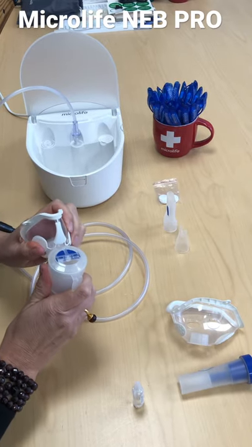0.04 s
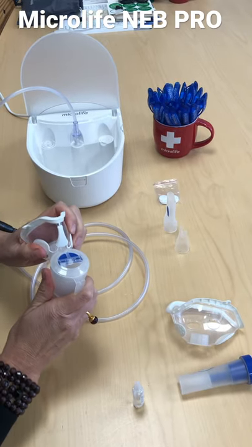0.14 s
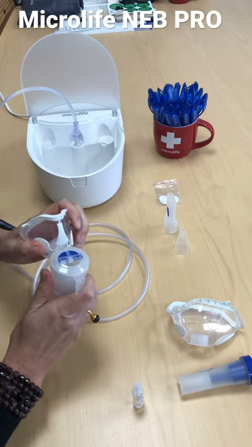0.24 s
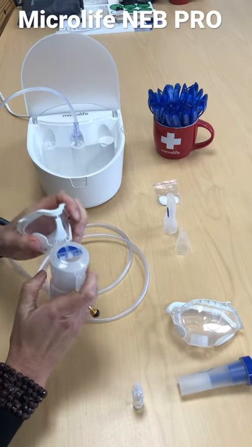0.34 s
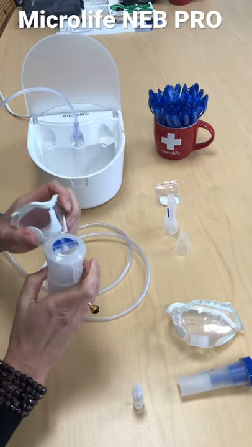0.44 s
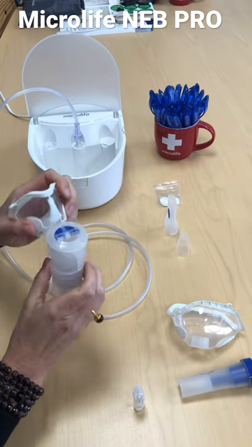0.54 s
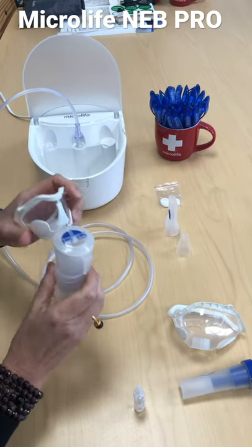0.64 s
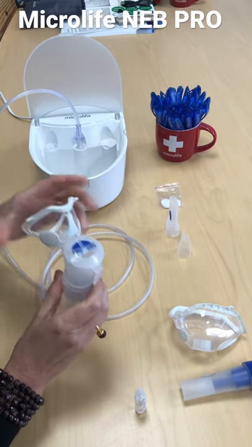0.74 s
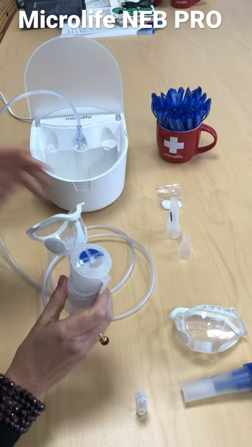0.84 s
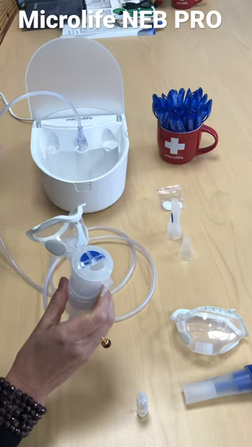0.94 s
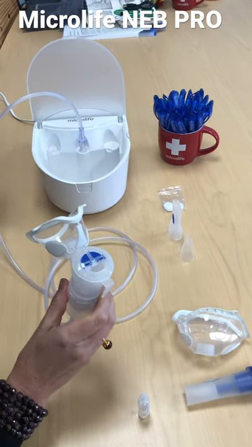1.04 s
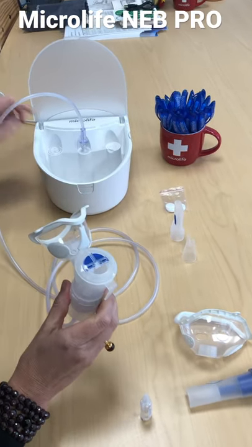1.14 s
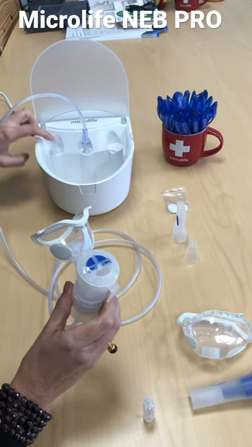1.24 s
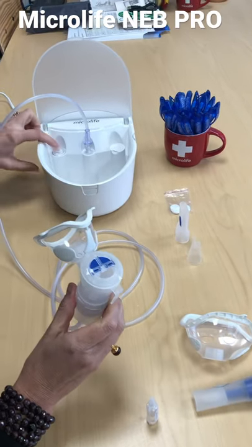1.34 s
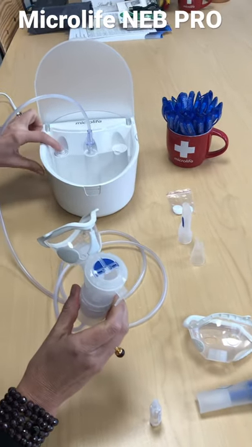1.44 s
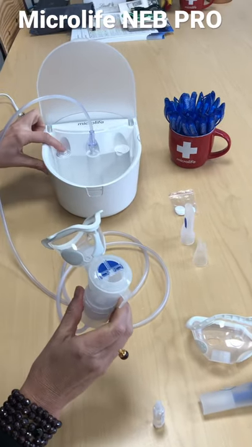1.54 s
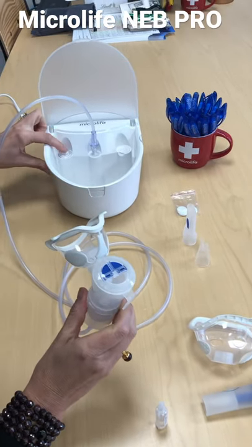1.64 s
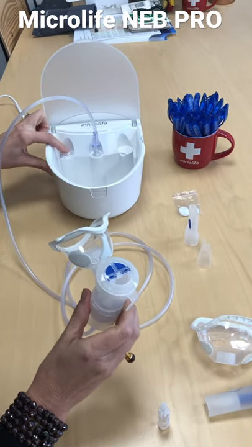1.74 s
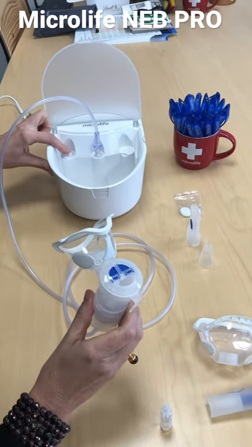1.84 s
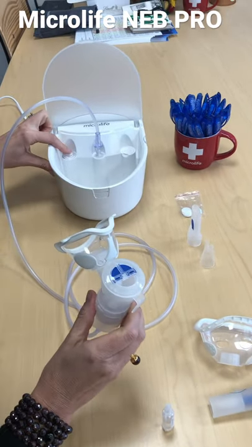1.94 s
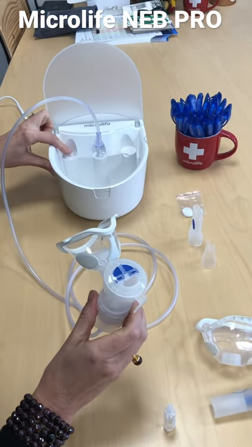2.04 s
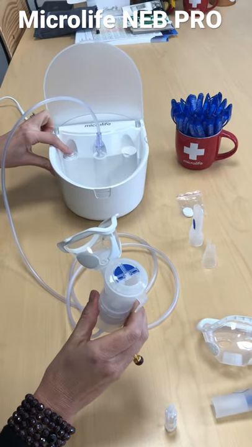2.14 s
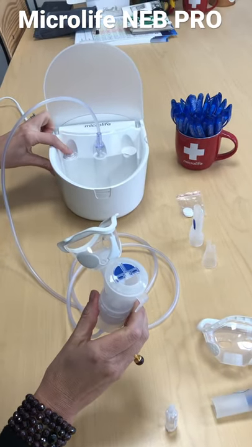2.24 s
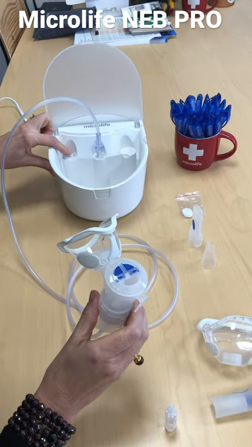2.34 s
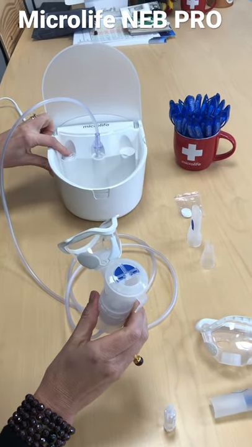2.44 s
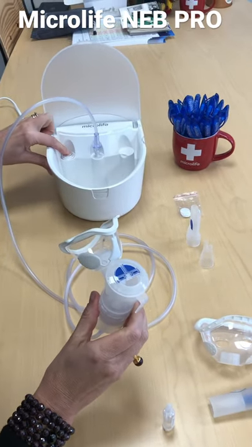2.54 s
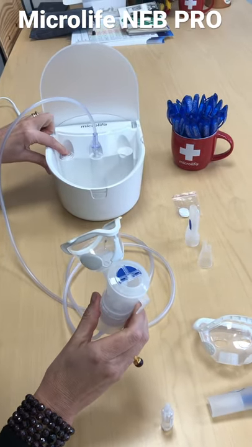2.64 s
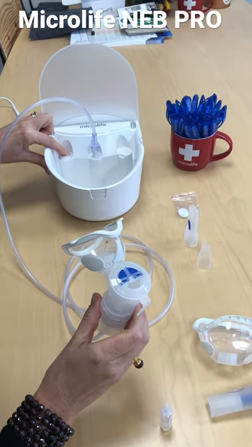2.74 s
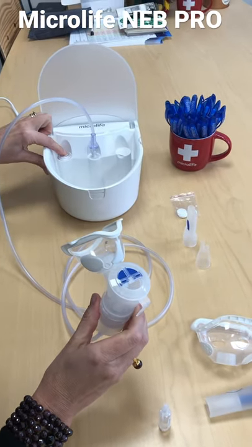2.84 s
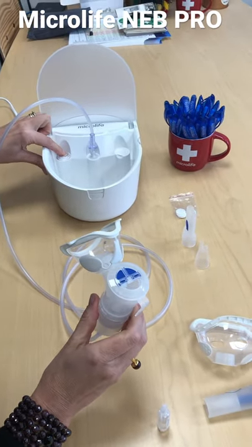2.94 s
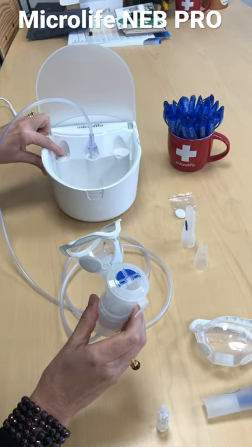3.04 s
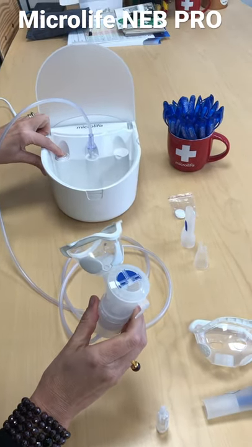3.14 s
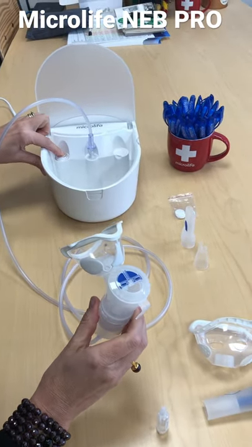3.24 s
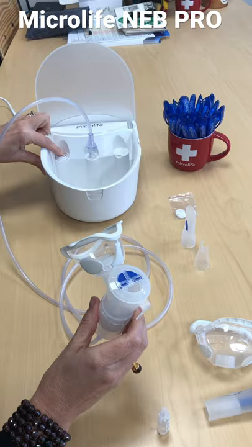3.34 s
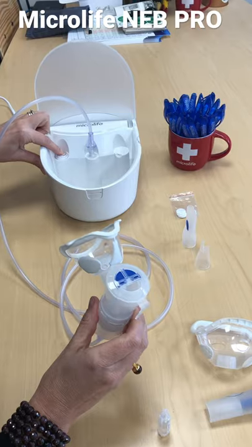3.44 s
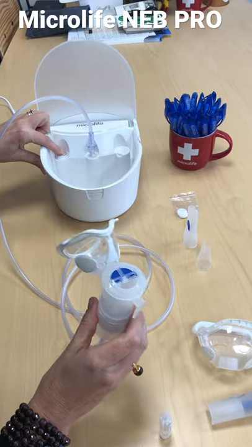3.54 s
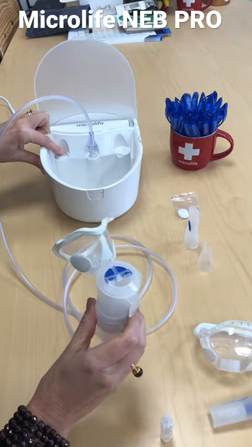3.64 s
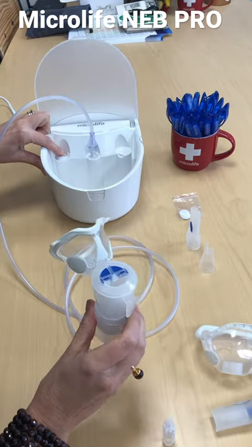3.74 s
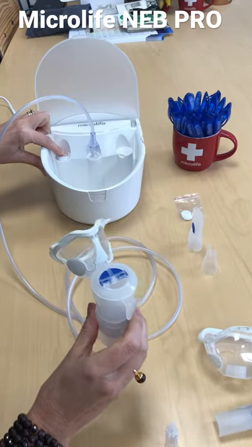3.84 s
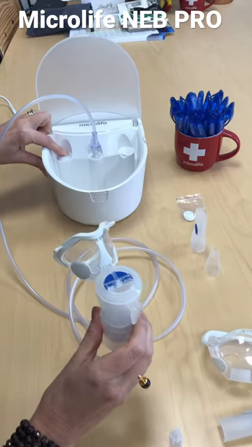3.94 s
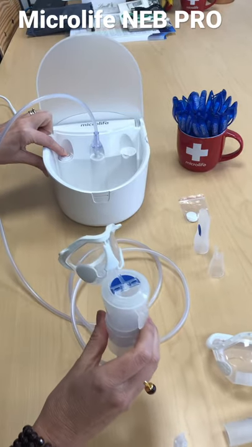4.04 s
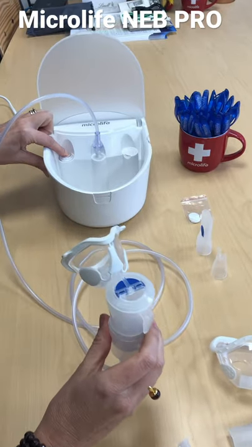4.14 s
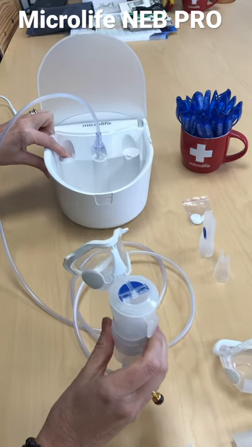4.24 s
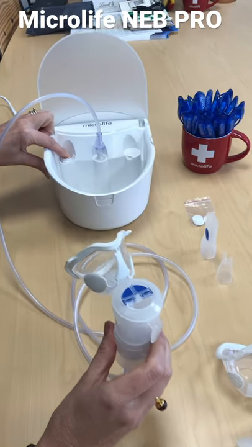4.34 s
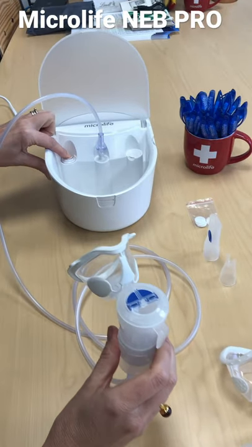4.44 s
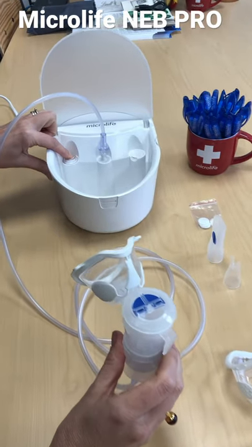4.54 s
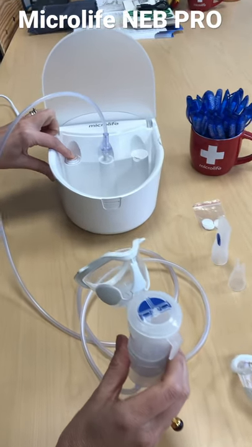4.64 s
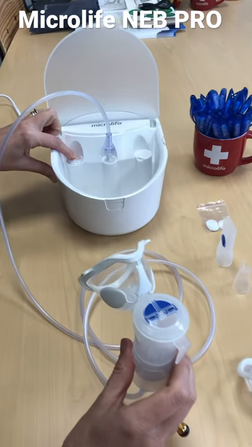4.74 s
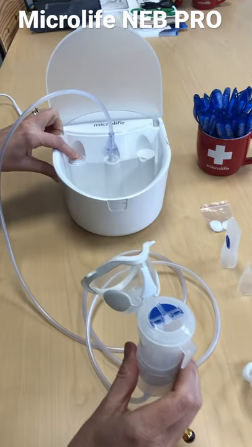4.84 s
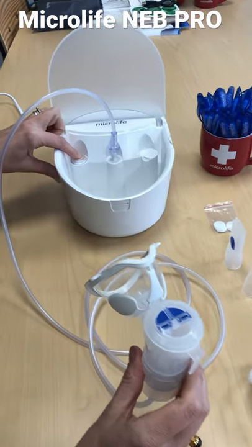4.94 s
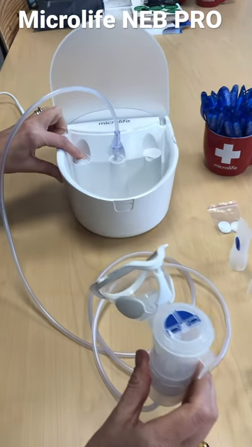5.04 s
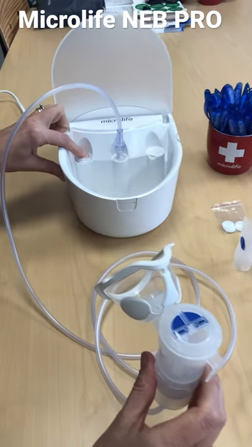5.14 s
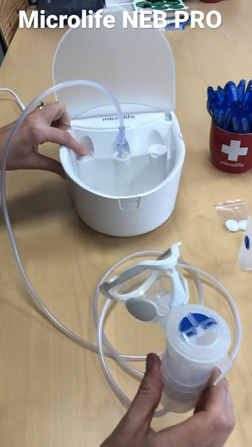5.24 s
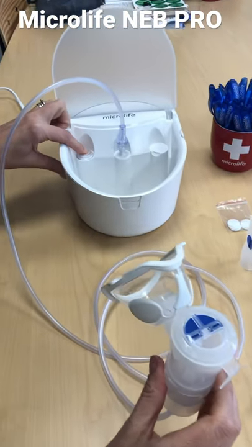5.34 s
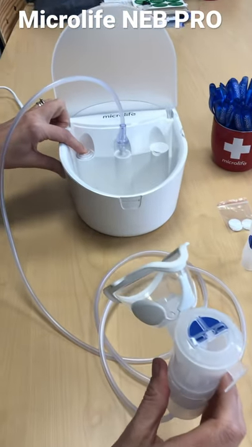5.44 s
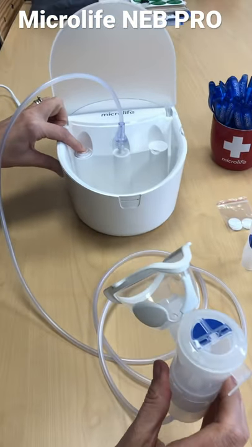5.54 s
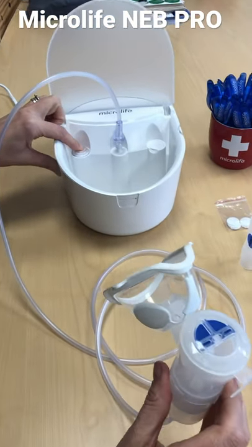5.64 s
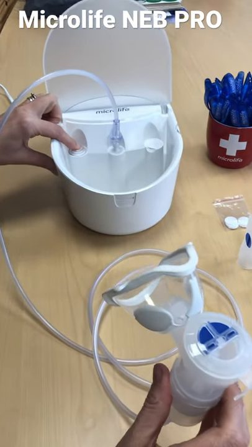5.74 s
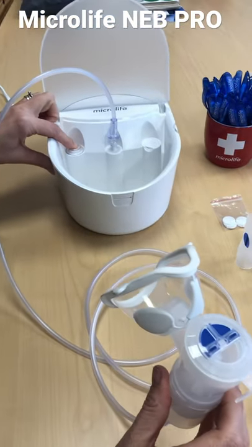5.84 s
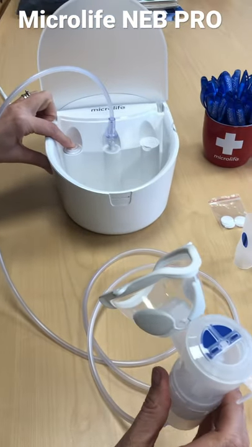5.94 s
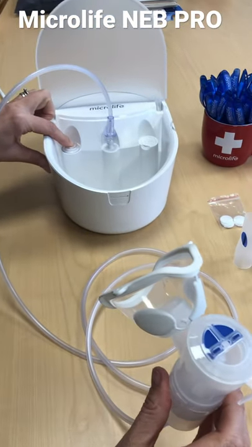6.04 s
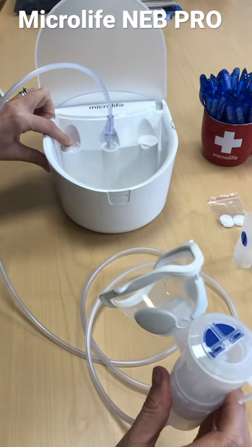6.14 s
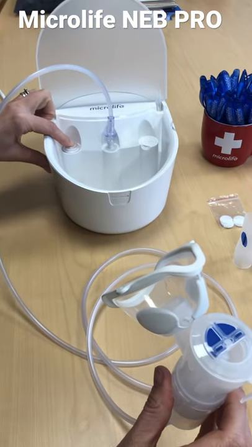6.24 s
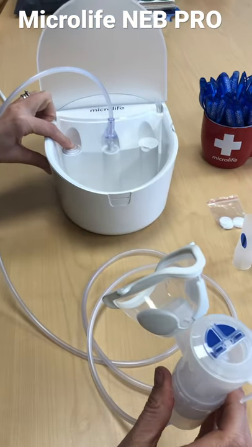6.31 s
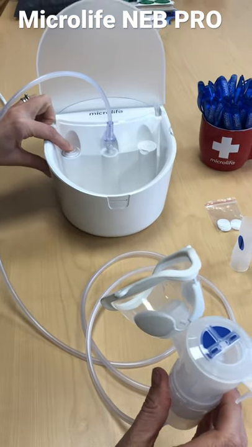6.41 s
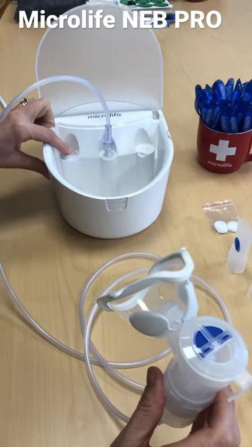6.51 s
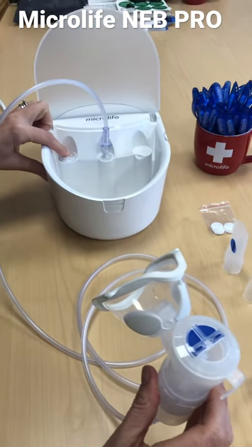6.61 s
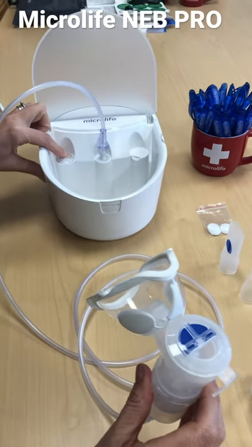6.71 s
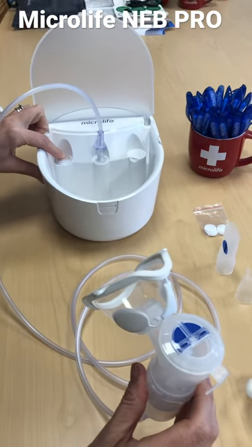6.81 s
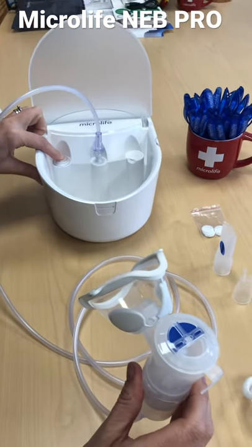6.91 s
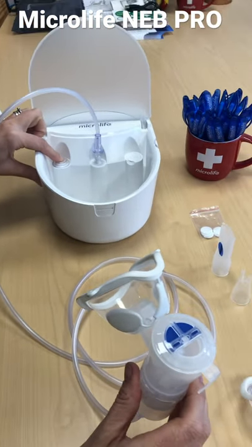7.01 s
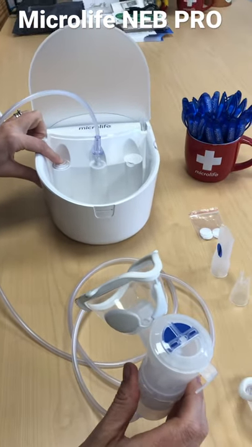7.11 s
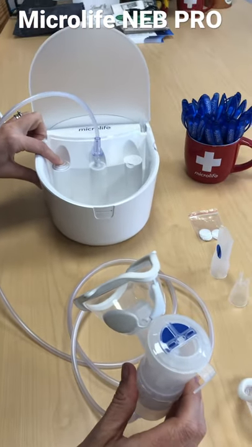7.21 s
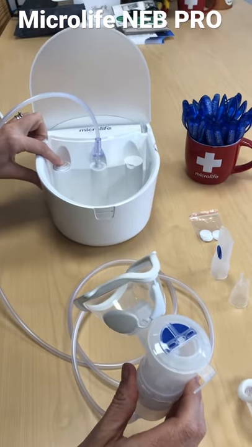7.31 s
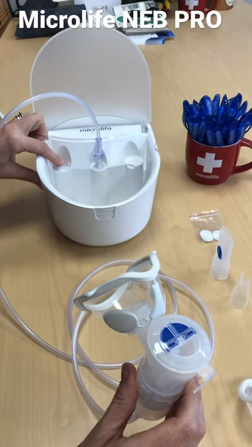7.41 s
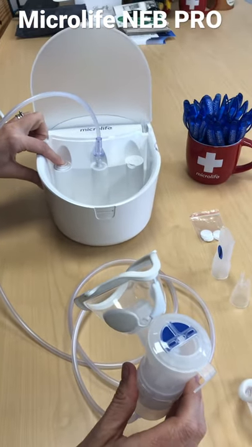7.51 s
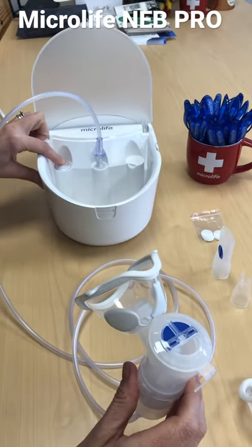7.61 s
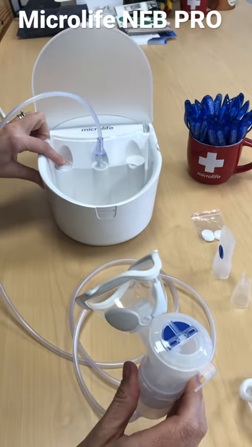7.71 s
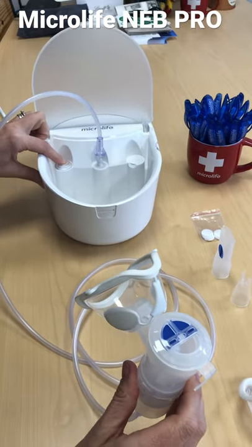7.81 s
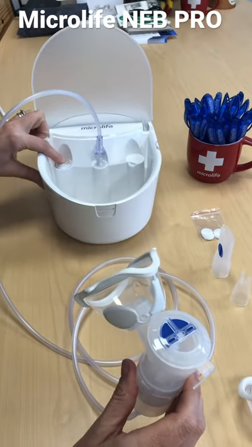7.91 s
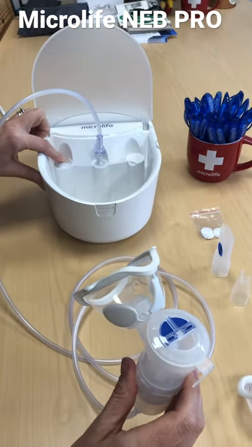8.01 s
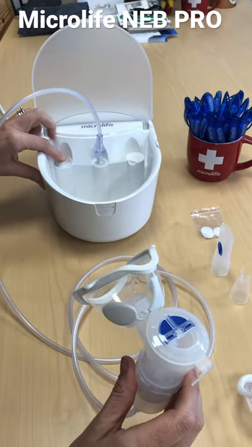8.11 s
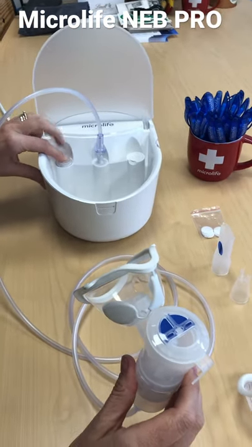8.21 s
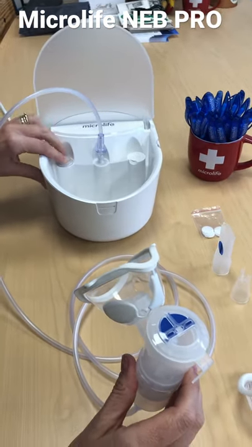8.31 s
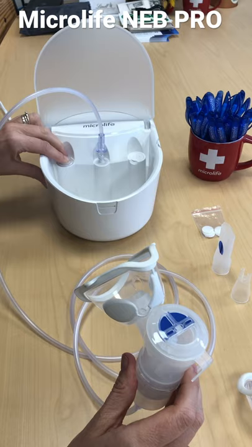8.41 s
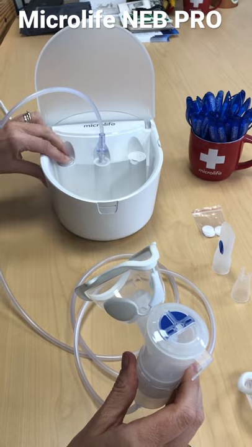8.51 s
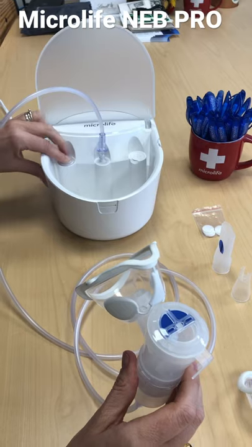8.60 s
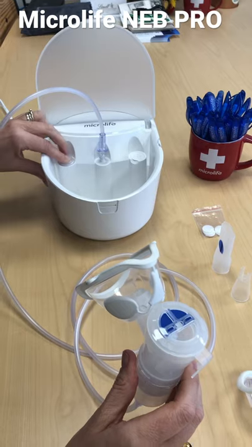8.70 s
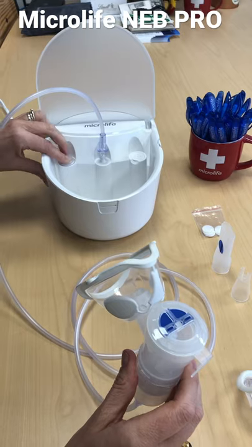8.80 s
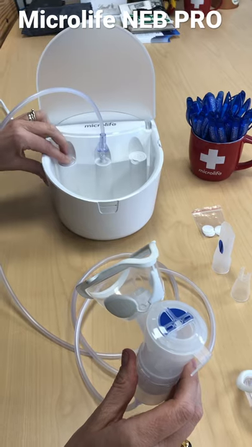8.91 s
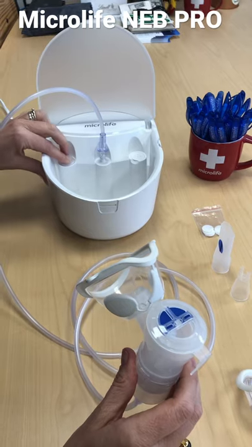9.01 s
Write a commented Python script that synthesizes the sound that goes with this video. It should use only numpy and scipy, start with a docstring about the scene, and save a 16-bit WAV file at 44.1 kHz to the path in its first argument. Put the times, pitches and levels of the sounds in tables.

```python
"""A quiet room rumbles, with a faint low hum that soon stops, and light plastic parts tick and rub together.
A rocker switch then snaps, and the small piston compressor of a nebulizer spins up and hums.
Its air hisses through the jet of a hand-held plastic cup, which is turned and brought nearer.
Struck bodies are sums of dying modes, rubbing and flow are coloured noise, and one turning shaft
times the hum, whine, valve puffs and jet pulsation; a single close microphone hears it all."""
import sys
import numpy as np
from scipy import signal
from scipy.io import wavfile

SR = 44100
rng = np.random.default_rng(int(sys.argv[2]) if len(sys.argv) > 2 else 0)


def persist_wave(psi):
    """Save psi, clipped to +-1, as 16-bit WAV."""
    counts = np.round(np.clip(psi, -1, 1) * 32767).astype(np.int16)
    wavfile.write(sys.argv[1], SR, np.atleast_2d(counts).T)


N = 399544
TIME = np.arange(N) / SR  # seconds

# Background rumble of the room. Each row: frequency in Hz, relative level in dB.
RUMBLE_SPECTRUM = [(18, -53), (30, -24), (45, -10.5), (85, -11.5), (108, -4.5), (170, -10), (206, -5),
                   (240, -11), (330, -14.5), (394, -14.5), (460, -17), (680, -22), (1200, -27.5),
                   (3000, -34.5), (16000, -42.5)]
RUMBLE_DB = -64  # rms
# A faint low hum: rms level in dB, moment it stops and time constant of its decay in seconds.
LOW_HUM_DB, LOW_HUM_END_S, LOW_HUM_RELEASE_S = -62.5, 0.285, 0.014
# Reverberation of the room. Each row: frequency in Hz, time to fall by 60 dB in seconds.
ROOM_DECAY = [(200, .4), (1000, 0.44), (4000, 0.59), (9000, 0.23), (16000, 0.4)]

# Parts sliding on each other. Each row: start in seconds, length in seconds, rms level at mid-stroke in dB.
SLIDES = [(0.148, 0.11, -72), (0.31, 0.06, -73), (0.385, 0.048, -68), (0.44, 0.04, -66), (0.63, 0.08, -76)]
# Plastic parts touching. Each row: start in seconds, approximate peak of the contact in dB,
# level of the hollow ring against that peak in dB, extra treble in dB per octave.
TICKS = [(0.153, -48, 1, 7), (0.176, -40.5, -3, -3), (0.211, -60, -11, -4), (0.301, -51, -3, -9),
         (0.328, -47, -15, 4), (0.336, -56, -7, -3), (0.398, -51, -14, -7), (0.412, -49, -16, 6),
         (0.437, -55, -12, 0), (0.457, -52, -19, 2), (0.465, -51.5, -17, -6), (0.584, -59, 1, -10),
         (0.638, -50, -16, -7), (0.656, -51, -9, -8), (0.672, -53.5, 6, -12), (0.684, -53, -4, -3)]
# Modes of the hollow parts. Each row: frequency in Hz, relative level in dB, time to fall by 60 dB in seconds.
PART_MODES = [(1320, -4, 0.029), (1590, 3, 0.029), (1930, -5, 0.032), (2200, -14, .04), (3320, -10, 0.031)]
# Colour of plastic contact. Each row: frequency in Hz, relative level in dB.
CONTACT_SPECTRUM = [(300, -21), (1000, -3), (2000, 2), (2700, -5), (4200, 2), (6500, -5), (9000, -5),
                    (12000, -10), (16000, -14)]

# The switch tips over, snaps and rebounds. Each row: start in seconds, approximate peak of the contact in dB.
SNAPS = [(2.4353, -32), (2.4398, -13.5), (2.4432, -24), (2.4508, -26)]
# Colour of the snap. Each row: frequency in Hz, relative level in dB.
SNAP_SPECTRUM = [(150, -45), (380, -22), (540, 4), (640, -3), (760, -12), (900, -29), (1400, -8),
                 (2300, -8), (4400, -4), (5650, 2), (6400, -8), (8850, 2.5), (10500, -10), (16000, -17)]
# Modes of the housing. Each row: frequency in Hz, relative level in dB, time to fall by 60 dB in seconds.
HOUSING_MODES = [(550, 4.5, 0.036), (556, -6, .1), (620, -8, .15), (860, -8, .06), (1600, -10, 0.12),
                 (1850, 2, 0.064), (2000, -12, .08), (3870, -6, 0.095), (5870, -5, .08), (7500, -11, .08),
                 (9000, -3, .09)]

# The motor gains speed at constant power, and slows a little under pressure and as it warms.
ON_S, SPIN_UP_S = 2.44, 0.242
RUN_HZ, UNLOADED_HZ, SAG_HZ_PER_S = 43.71, 0.3, 0.03
HUM_STANDSTILL_DB, VALVES_STANDSTILL_DB = -36, -20  # against full speed
# Winding buzz. Each row: frequency in Hz, rms level in dB.
WINDING_LINES = [(100, -63.5), (200, -66), (500, -67.5), (597, -55.5)]
# The shaft shifts the 100 Hz buzz up or down. Each row: multiple of the turn rate, rms level at full speed in dB.
BUZZ_SIDEBANDS = [(1, -62.5), (17, -62.5), (-17, -63), (-15, -63)]
# Harmonics of the shaft. Each row: multiple of the turn rate, relative level in dB.
SHAFT_ORDERS = [(1, -17), (2, -7.5), (3, -14), (4, 0), (5, -19), (6, -7.5), (7, -10), (8, -11.5),
                (9, -19.5), (10, -17), (11, -8), (12, -11.5), (13, -15), (14, 1), (15, -8), (16, -19),
                (17, -14.5), (18, -13.5), (19, -20), (20, -21), (21, -16), (22, -18), (23, -20.5),
                (25, -23.5)]
# Colour of pump and valves. Each row: frequency in Hz, relative level in dB.
VALVE_SPECTRUM = [(20, -65), (36, -27), (76, -15.5), (124, -11), (171, -20), (270, -15), (398, -23.5),
                  (471, -1), (548, -5), (607, -6.5), (706, -7), (790, -10.5), (880, -4), (1050, -14.5),
                  (1200, -23.5), (1700, -22.5), (2400, -57.5)]

# Rotor whine while pulling up to speed. Each row: multiple of the turn rate, rms level in dB.
WHINE_PARTIALS = [(16, -40), (18, -45)]
WHINE_S, WHINE_ATTACK_S, WHINE_HOLD_S, WHINE_RELEASE_S = 2.57, 0.012, 0.044, 0.006
WHINE_LEAD_S, WHINE_LEAD_DB = 0.056, -12  # it creeps in softly beforehand
WHINE_RING_HZ, WHINE_RING_Q, WHINE_RING_DB = 611, 65, 1  # the housing resonance it excites

# Air starts to flow and fills the hose; until then the outlet rings less,
# and the jet is weaker and puffs with each stroke.
AIR_S, FILL_S = 2.535, 0.347
EMPTY_OUTLET_DB, EMPTY_JET_DB, PUFF_DEPTH = -11, -1, 0.34
# The jet only leaks at first, then catches.
LEAK_DB, CATCH_S, CATCH_RISE_S = -13, 2.614, 0.042
# Air resonances of the cup. Each row: frequency in Hz, half width parameter in Hz, then relative level in dB
# when turned away, when upright, and when tipped toward the microphone.
CUP_RESONANCES = [(400, 70, -35, -20, -16), (990, 87, -34, -21.5, -19.5), (2046, 128, -13, -13, -15),
                  (2610, 126, -8, -5.5, -5.5), (3580, 140, -17, -12, -19), (4090, 210, -12.5, -13, -12),
                  (4570, 178, 0, -0.5, 0.5), (5080, 97, -9, -12, -12), (5830, 130, -10, -19, -13),
                  (6600, 240, -15, -14.5, -15), (7305, 180, -8.5, -2, -2), (7986, 130, 0, -4, -2),
                  (8780, 260, -12, -13.5, -11.5), (9570, 180, -10, -13.5, -13),
                  (10400, 170, -8, -18.5, -11), (10950, 200, -11, -9, -7), (12440, 210, -18, -16, -26),
                  (11900, 290, -15, -8, -9.5), (13250, 400, -21, -15, -32), (14800, 370, -20, -3, -9.5),
                  (15640, 290, 0, -3.5, -1)]
BEAM_SWAY_DB = 1.0  # each resonance swells and fades with the unsteady hand
# Broad hiss between the resonances. Each row: frequency in Hz, relative level in dB.
JET_SPECTRUM = [(1200, -26), (3000, -20.5), (6000, -16.5), (10000, -31), (13000, -36), (14000, -12.5),
                (16000, -13)]
# How the cup is held. Each row: time in seconds, pose (0 turned away, 1 upright, 2 tipped toward the microphone).
FACING = [(2.6, 0.4), (3.5, 0.04), (3.8, 1.05), (4.8, 0.84), (5.15, 1.6), (5.55, 1.4), (5.75, 1.9)]
# The cup comes nearer. Each row: time in seconds, level of the full direct hiss in dB.
NEARNESS = [(3.0, -34), (4.2, -33), (4.5, -32.5), (5.35, -30.7), (5.68, -29.5), (5.9, -30), (6.9, -31),
            (8.55, -30.5), (9.06, -31.5)]
# Reflections off the desk and the hand. Each row: mean delay in ms, initial strength as a ratio.
GLANCES = [(1.052, 0.063), (2.3, 0.21)]
# The paths waver by a fraction of their delay, and weaken as the cup is lifted.
HAND_SWAY, SWAYS_PER_S, GLANCE_FADE_DB_PER_S = 0.036, 1.2, -0.5

EDGE_HZ = 15800  # upper limit of the band


def amp(db):
    """Level law: 20 dB is a factor of ten in amplitude."""
    return 10 ** (np.asarray(db) / 20)


def unit(x):
    """Power normalization: scales a signal to rms 1."""
    return x / np.sqrt(np.mean(x ** 2) + 1e-20)


def read(points, hz):
    """Spectral interpolation: reads a table on a log-frequency axis."""
    f, value = np.transpose(points)
    return np.interp(np.log(hz + 1), np.log(f + 1), value)


def follow(rows, t):
    """Linear interpolation in time: reads each column of a curve at the times t."""
    s, *columns = np.transpose(rows)
    return [np.interp(t, s, c) for c in columns]


def add(mix, s, sound):
    """Superposition: mixes a sound in at s seconds."""
    part = mix[round(s * SR):][:len(sound)]
    part += sound[:len(part)]


def ramp(start, length):
    """Linear growth: rises in a straight line from 0 to 1."""
    return np.clip((TIME - start) / length, 0, 1)


def release(start, length):
    """Exponential decay: holds at 1, then dies away with the time constant length."""
    return np.exp(-np.maximum(TIME - start, 0) / length)


def drift(rate):
    """Random modulation: straight lines between normal random values, 2 * rate of them a second."""
    t = np.arange(0, N / SR + 1, .5 / rate)
    return np.interp(TIME, t, rng.standard_normal(4096)[:len(t)])


def tint(x, points):
    """Minimum-phase filtering: the log gain fixes the phase of a causal response; output has rms 1."""
    gain_db = np.maximum(read(points, abs(np.fft.fftfreq(8192, 1 / SR))), -100)
    log_gain = np.log(amp(gain_db))
    response = np.exp(np.conj(signal.hilbert(log_gain)))
    taps = np.fft.ifft(response).real[:4096]
    return unit(signal.fftconvolve(x, taps)[:len(x)])


def ring(modes, t):
    """Modal decay: a struck body is a sum of exponentially dying sines; peak 1."""
    x = 0
    for hz, db, t60 in modes:
        x = x + amp(db - 60 * t / t60) * np.sin(2 * np.pi * (hz * t + rng.random()))
    return x / abs(x).max()


def crack(colour, t, decay):
    """Impulsive contact: fine chatter is a dying burst of coloured noise; peak near 1."""
    burst = rng.standard_normal(len(t)) * np.exp(-t / decay)
    return tint(burst, colour) * np.sqrt(decay * SR / len(t) / 10)


def room(x):
    """Reverberation: sparse reflections, each frequency band dying at its own speed."""
    length = SR // 2
    taps = rng.standard_normal(length) * (rng.random(length) < .1)
    taps *= TIME[:length] > .004  # no reflection in the first 4 ms
    hz, t, z = signal.stft(taps, SR, nperseg=256)
    decay = amp(-60 * t / read(ROOM_DECAY, hz)[:, None])
    tail = signal.istft(z * decay, SR)[1]
    return signal.fftconvolve(x, tail / np.linalg.norm(tail))[:N]


def ambience():
    """Stationary background: filtered noise rumbles beside a pure 100 Hz tone that stops."""
    rumble = amp(RUMBLE_DB) * tint(rng.standard_normal(N), RUMBLE_SPECTRUM)
    tone = unit(np.sin(2 * np.pi * 100 * TIME))
    return rumble + amp(LOW_HUM_DB) * release(LOW_HUM_END_S, LOW_HUM_RELEASE_S) * tone


def sliding():
    """Stick-slip friction: a random stream of tiny slips; each stroke swells and fades."""
    slips = rng.standard_normal(N) * (rng.random(N) < 1500 / SR)  # about 1500 a second
    strokes = sum(amp(db) * np.sin(np.pi * ramp(s, length)) for s, length, db in SLIDES)
    return strokes * tint(slips, CONTACT_SPECTRUM)


def parts():
    """Impact excitation: each contact rings the hollow parts, with its own share of ring and treble."""
    out, t = np.zeros(N), TIME[:SR // 6]
    hz, contact_db = np.transpose(CONTACT_SPECTRUM)
    octaves = np.clip(np.log2(hz / 4500), 0, 1.5)  # above 4500 Hz
    for s, db, hollow_db, treble_db in TICKS:
        colour = np.transpose([hz, contact_db + treble_db * octaves])
        contact = crack(colour, t, decay=0.0028)
        add(out, s, amp(db) * (contact + amp(hollow_db) * ring(PART_MODES, t)))
    return out + amp(-13) * room(out)


def switch():
    """Snap action: each sudden contact of the rocker sets the modes of the housing ringing."""
    out, t = np.zeros(N), TIME[:SR // 4]
    for s, db in SNAPS:
        contact = crack(SNAP_SPECTRUM, t, decay=0.0049)
        add(out, s, amp(db) * (contact + amp(-17.0) * ring(HOUSING_MODES, t)))
    return out + amp(-11.0) * room(out)


def windings(turns, motor_db):
    """Electromagnetic buzz: steady lines from switching on; rotation adds sidebands to the 100 Hz line."""
    buzz = sum(amp(db) * np.sin(2 * np.pi * (hz * TIME + rng.random())) for hz, db in WINDING_LINES)
    carrier = WINDING_LINES[0][0] * TIME
    sidebands = sum(amp(db) * np.sin(2 * np.pi * (carrier + k * turns)) for k, db in BUZZ_SIDEBANDS)
    return np.sqrt(2) * ramp(ON_S, 0.038) * (buzz + amp(motor_db) * sidebands)


def rotor(turns):
    """Order tracking and resonance: two partials rise with the shaft, stop and leave the housing ringing."""
    partials = sum(amp(db) * np.sin(2 * np.pi * (round(k) * turns + rng.random())) for k, db in WHINE_PARTIALS)
    lead = amp(WHINE_LEAD_DB) * ramp(WHINE_S - WHINE_LEAD_S, WHINE_LEAD_S)
    swell = np.maximum(lead, ramp(WHINE_S, WHINE_ATTACK_S))
    ending = release(WHINE_S + WHINE_ATTACK_S + WHINE_HOLD_S, WHINE_RELEASE_S)
    whine = np.sqrt(2) * partials * swell * ending
    b, a = signal.iirpeak(WHINE_RING_HZ, WHINE_RING_Q, fs=SR)
    return whine + amp(WHINE_RING_DB) * signal.lfilter(b, a, whine + 1e-18)


def hum(turns, motor_db, empty):
    """Periodic forcing: piston and shaft shake the housing in harmonics; the higher ones waver more."""
    outlet_db, lines = EMPTY_OUTLET_DB * empty, np.zeros(N)
    for k, db in SHAFT_ORDERS:
        k = round(k)
        near_outlet = np.exp(-(k - 14) ** 2 / 2)  # the outlet rings around the 14th harmonic
        waver = 1 + (.015 + 0.0047 * k) * drift(9)
        tone = np.cos(2 * np.pi * (k * turns + rng.random()))
        lines += amp(db + near_outlet * outlet_db) * waver * tone
    return amp(motor_db - 42.0) * lines / np.std(lines[TIME > AIR_S])


def valves(turns, motor_db):
    """Modulated flow noise: intake and outlet each puff once a turn, one harder than the other."""
    puffs = 0.4 + np.exp(-(2 * turns % 1) / 0.31)
    puffs *= 1 + 0.64 * np.sin(2 * np.pi * turns)
    return amp(motor_db - 49.5) * tint(puffs * rng.standard_normal(N), VALVE_SPECTRUM)


def glances(hz, t):
    """Comb filtering: short echoes off desk and hand interfere; the comb wanders as the hand sways."""
    echoes = 0
    for delay_ms, strength in GLANCES:
        sway = 1 + HAND_SWAY * np.interp(t, TIME, drift(SWAYS_PER_S))
        delay = delay_ms / 1000 * sway
        echoes = echoes + strength * np.exp(-2j * np.pi * np.outer(hz, delay))
    return abs(1 + echoes * amp(GLANCE_FADE_DB_PER_S * np.maximum(t - AIR_S, 0)))


def jet(turns, empty):
    """Turbulence and resonance: air noise, pulsing with the piston, excites the cavity of the cup."""
    puffing = PUFF_DEPTH * empty ** 2
    throb = 1 + puffing * np.cos(2 * np.pi * turns) + 0.056 * drift(25)
    hz, t, z = signal.stft(throb * rng.standard_normal(N), SR, nperseg=1024, noverlap=768)
    f, width, *poses = np.transpose(CUP_RESONANCES)
    shapes = 1 / (1 + ((hz[:, None] - f) / width) ** 2) ** 2
    # each resonance beams its own way, so the colour shifts as the cup turns
    facing = np.clip(follow(FACING, t)[0], 0, 2)
    peaks_db = sum(np.outer(db, np.maximum(1 - abs(facing - k), 0)) for k, db in enumerate(poses))
    sway = np.array([np.interp(t, TIME, drift(SWAYS_PER_S)) for _ in f])
    peaks_db = peaks_db + BEAM_SWAY_DB * sway
    # the first puffs are less tuned
    broad_db = read(JET_SPECTRUM, hz)[:, None] + 5 * np.interp(t, TIME, puffing)
    power = amp(broad_db) ** 2 + shapes @ amp(peaks_db) ** 2
    colour = np.sqrt(power) * glances(hz, t)
    colour *= hz[:, None] < EDGE_HZ + 200
    colour /= np.sqrt(np.mean(colour ** 2, axis=0))  # colour alone, so level is set below
    air = signal.istft(z * colour, SR, nperseg=1024, noverlap=768)[1][:N]
    leak = 1 - (1 - amp(LEAK_DB)) * release(CATCH_S, CATCH_RISE_S)
    flow = ramp(AIR_S, 0.019) * leak
    air = amp(follow(NEARNESS, TIME)[0] + EMPTY_JET_DB * empty) * flow * air
    return air + amp(-14.5) * room(air)


def compressor():
    """Common drive: one shaft times hum, whine, valves and jet; its speed and the hose pressure shape them."""
    pace = np.sqrt(ramp(ON_S, SPIN_UP_S))  # share of full speed; constant power feeds the square of speed
    empty = np.exp(-(np.maximum(TIME - AIR_S, 0) / FILL_S) ** 2)  # 1 with a slack hose, 0 at full pressure
    speed_hz = pace * (RUN_HZ + UNLOADED_HZ * empty - SAG_HZ_PER_S * (TIME - ON_S))
    turns = np.cumsum(speed_hz * (1 + .0012 * drift(12))) / SR
    motor_db = HUM_STANDSTILL_DB * (1 - pace)
    valves_db = VALVES_STANDSTILL_DB * (1 - pace)
    pump = (hum(turns, motor_db, empty) + valves(turns, valves_db)) * (TIME > ON_S)
    return windings(turns, motor_db) + rotor(turns) + pump + jet(turns, empty)


def scene():
    """Superposition at one microphone: all sources sum to the same signal in both channels."""
    mono = ambience() + sliding() + parts() + switch() + compressor()
    return np.array([mono, mono])


def record(dry):
    """Band limitation: the microphone rolls off below 33 Hz, then a steep low-pass ends the treble."""
    highpass = signal.butter(4, 33, "highpass", fs=SR, output="sos")
    x = signal.sosfilt(highpass, dry)
    lowpass = signal.firwin(601, EDGE_HZ, window=("kaiser", 9), fs=SR)
    return signal.oaconvolve(x, lowpass[None], "same")


dry = scene()
out = record(dry)
persist_wave(out)
```